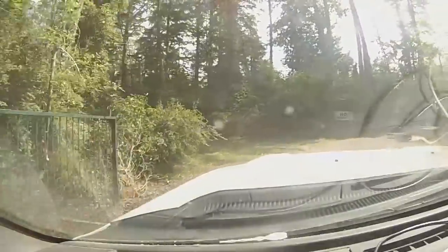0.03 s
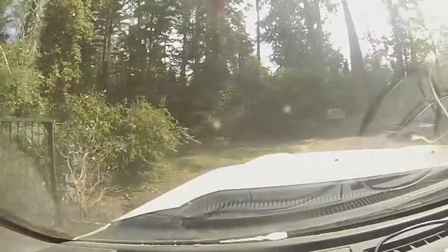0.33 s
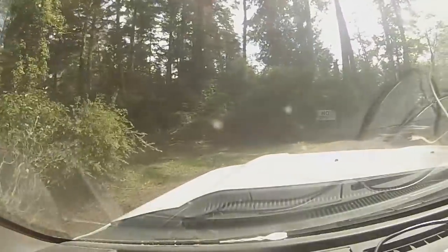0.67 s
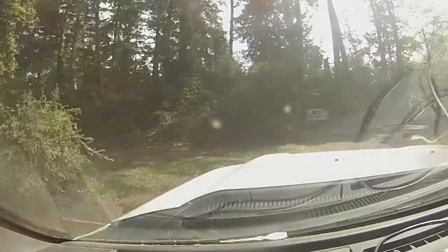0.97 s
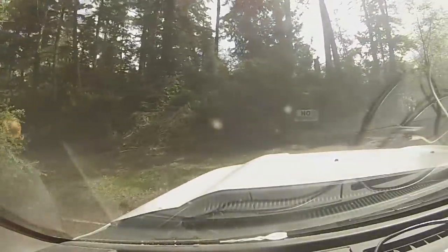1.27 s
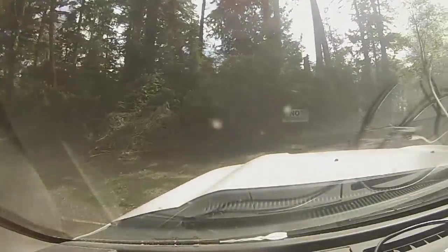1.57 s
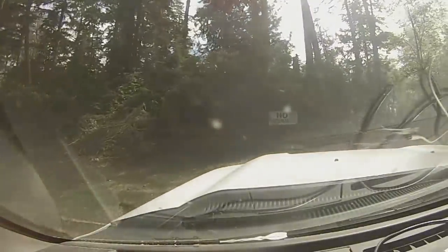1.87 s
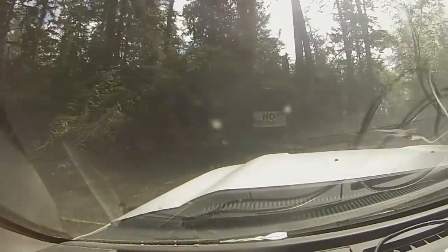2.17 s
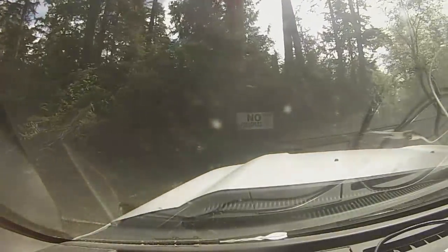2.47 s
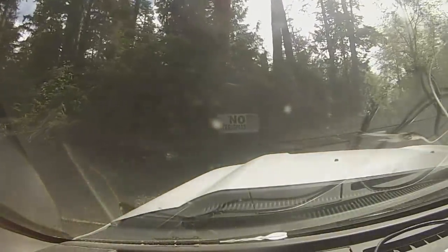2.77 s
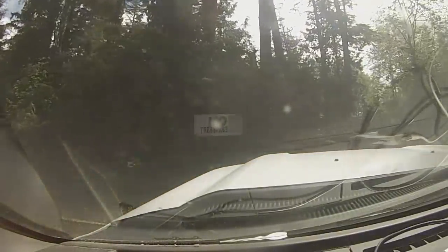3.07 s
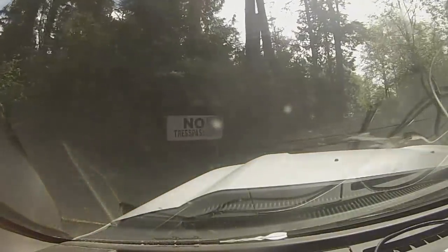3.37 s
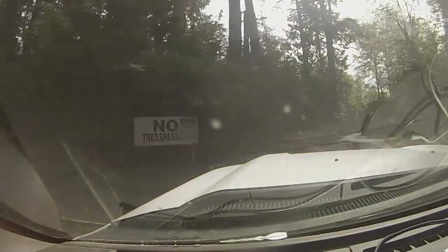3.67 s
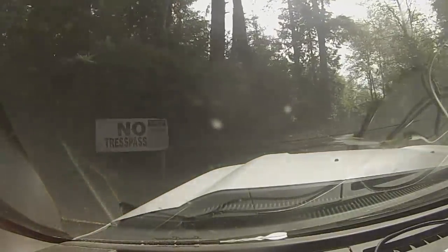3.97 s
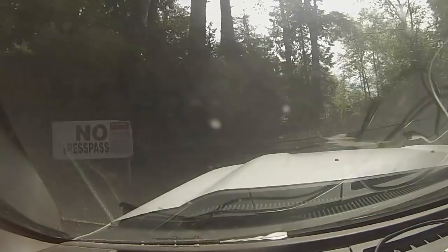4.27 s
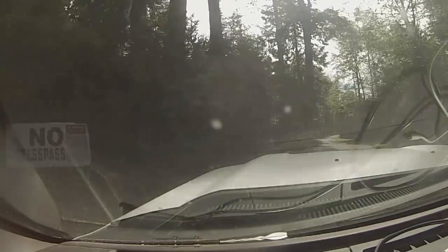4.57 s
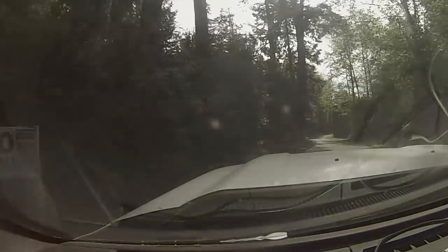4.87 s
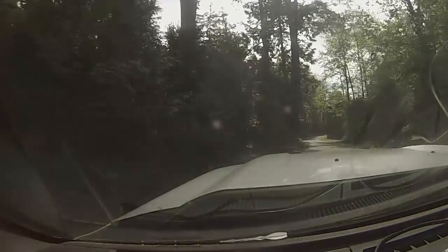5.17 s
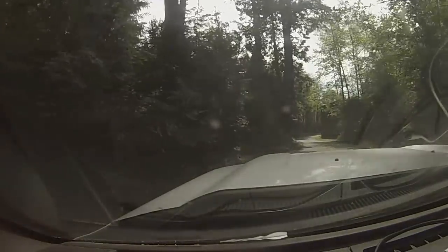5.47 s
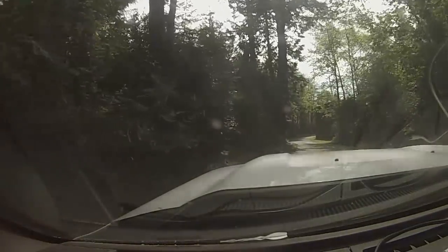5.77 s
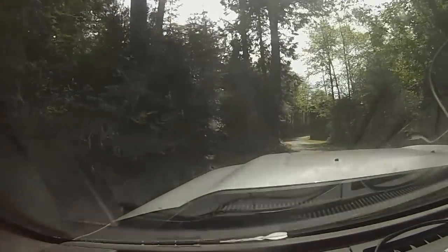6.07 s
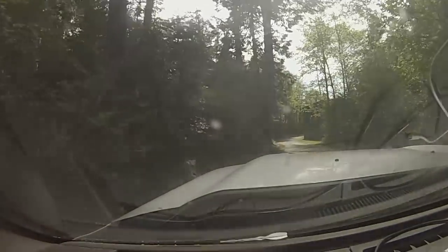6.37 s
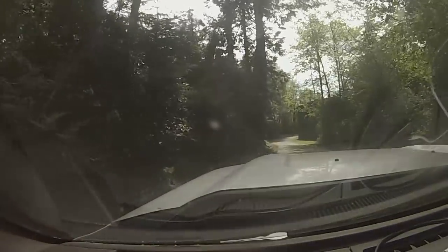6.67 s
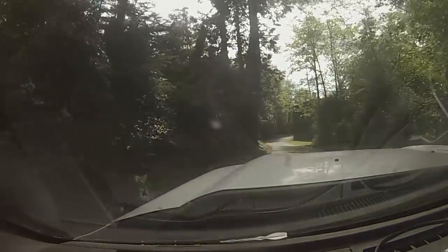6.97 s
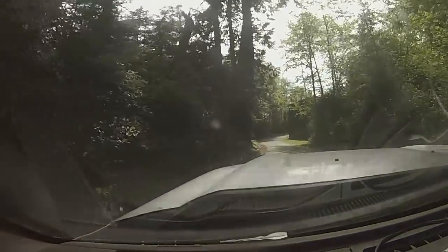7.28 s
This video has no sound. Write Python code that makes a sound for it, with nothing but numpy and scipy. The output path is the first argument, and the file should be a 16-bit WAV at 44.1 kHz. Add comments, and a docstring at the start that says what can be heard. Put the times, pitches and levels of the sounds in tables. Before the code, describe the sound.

Sharp, dry clicks and brief creaks come from a joint in a vehicle's flexing cab, heard close up from inside. They keep going unevenly over the deep rumble of the engine and tyres on rough ground. The engine slows and the ride goes quieter in the middle, then the revs rise toward the end, with low jolts and more frequent creaking.

```python
"""Inside the cab of a vehicle rolling slowly along a rough lane, heard from a camera's microphone.
The engine sags, then picks up behind the bulkhead, over body rumble, tyre noise and a hiss of air.
As the cab flexes, a joint close to the microphone sticks and slips, in single dry clicks and in runs
of about 30-50 a second. Every slip rings the same panel, the harder the brighter.
The camera's limiter ducks everything at the hard ones and recovers slowly."""
import sys
import numpy as np
from scipy import signal
from scipy.fft import rfft, irfft, next_fast_len
from scipy.io import wavfile
from scipy.ndimage import uniform_filter1d, minimum_filter1d

SR = 44100
rng = np.random.default_rng(int(sys.argv[2]) if len(sys.argv) > 2 else 0)


def inscribe(sig):
    """Save sig as 16-bit PCM at rate SR to the path in sys.argv[1].

    A 1-D sig is mono; a 2-D sig holds one channel per row.
    Samples are clipped to [-1, 1] before scaling.
    """
    pcm = np.round(np.clip(np.atleast_2d(sig).T, -1, 1) * 32767)
    wavfile.write(sys.argv[1], SR, pcm.astype(np.int16))


N = 323253


def undb(db):
    """Decibels to gain."""
    return 10 ** (np.asarray(db) / 20)


def unit(x):
    """Scale to rms 1."""
    return x / np.sqrt(np.mean(x ** 2))


def curves(table):
    """The columns of a (seconds, ..) table, one value a sample."""
    times, *columns = np.transpose(table)
    return [np.interp(np.arange(N) / SR, times, column) for column in columns]


def spectrum_db(points, hz):
    """Read (Hz, dB) points on a log-frequency axis."""
    point_hz, db = np.transpose(points)
    return np.interp(np.log(hz + 1), np.log(point_hz), db)


def noise(colour):
    """Noise of the given colour, rms 1."""
    size = next_fast_len(N, True)
    gain = undb(spectrum_db(colour, np.fft.rfftfreq(size, 1 / SR)))
    return unit(irfft(rfft(rng.standard_normal(size)) * gain, size)[:N])


def walk(rate):
    """Random levels held 1 / rate seconds and smoothed twice; spread near 1."""
    hold = int(SR / rate)
    steps = np.repeat(rng.standard_normal(N // hold + 1), hold)
    return 1.292 * uniform_filter1d(uniform_filter1d(steps, hold), hold)[:N]


def causal(db):
    """Frequency response with these gains that starts at once and then dies away."""
    cepstrum = irfft(np.log(undb(db)))
    half = len(cepstrum) // 2
    cepstrum[1:half] *= 2
    cepstrum[half + 1:] = 0
    return np.exp(rfft(cepstrum))


# The air in the cab. Each row: frequency in Hz, relative level in dB.
AIR_COLOUR = [(300, -1.5), (1500, 1.5), (3500, -1.5), (6000, -7.5), (9000, -12), (11000, -12.5),
              (13500, -14), (14800, -26.5), (16000, -42.5)]


def air(level_db=-64):
    """A steady hiss of air, far in the background."""
    return undb(level_db) * noise(AIR_COLOUR)


# The colour of the jingle. Each row: frequency in Hz, relative level in dB.
JINGLE_COLOUR = [(4000, -58.5), (7500, -24), (8800, -8), (9400, 5.5), (10100, -14.5), (11500, -19),
                 (13500, -13.5), (15500, -47)]


def jingle(level_db=-66, gap_s=.07, pip_s=.028, count=200):
    """A faint, thin jingle near 9 kHz: short pips of one size at uneven intervals."""
    gaps = gap_s * (0.37 + rng.gamma(2, .35, count))
    starts = (np.cumsum(gaps) * SR).astype(int)
    pips = np.bincount(starts[starts < N], minlength=N)
    envelope = signal.fftconvolve(pips, np.hanning(int(pip_s * SR)), "same")
    return undb(level_db) * envelope * noise(JINGLE_COLOUR)


# A faint whine in the cab. Each row: time in seconds, pitch in Hz, level in dB.
WHINE_TRACK = [(2.8, 411, -79), (3.15, 405, -54), (3.5, 387.5, -57), (4.05, 392.3, -56), (5.1, 374, -64),
               (5.4, 311, -64.5), (5.75, 294.4, -48.5), (6.15, 291.5, -55.5), (6.5, 330, -65),
               (7.3, 352.4, -52)]


def whine(wobble=.008, flutter_db=4.0):
    """A thin, wavering tone, perhaps from the transmission."""
    hz, db = curves(WHINE_TRACK)
    level = undb(db + flutter_db * walk(17))
    cycles = np.cumsum(hz * (1 + wobble * walk(18))) / SR
    return level * np.sin(2 * np.pi * cycles)


# The lane under the wheels. Each row: time in seconds, roughness in dB against average ground.
LANE_ROUGHNESS = [(0, -2.5), (.25, 3.5), (.85, 3), (1.2, 1), (2.5, 2), (3.1, -2.5), (4.2, -4.5),
                  (5.05, -4.5), (5.7, 1.5), (6.55, 2), (6.9, -3), (7.33, -1.5)]


def roughness_db():
    """The roughness of the passing ground, which drives grit, tyre noise and body rumble."""
    return curves(LANE_ROUGHNESS)[0]


def grit(level_db=-53.5, per_s=80, spread_db=5, band_hz=(580, 1200), t60=0.043, size=4096):
    """Small stones crunch under the tyres and reach the microphone muffled by the floor."""
    stones = (rng.random(N) < per_s / SR) * undb(spread_db * rng.standard_normal(N))
    decay = undb(-60 * np.arange(size) / SR / t60)
    power = signal.fftconvolve(stones ** 2, decay ** 2)[:N]
    crunch = rng.standard_normal(N) * np.sqrt(np.abs(power))
    floor = signal.butter(3, band_hz, "bandpass", fs=SR, output="sos")
    return undb(level_db + roughness_db()) * unit(signal.sosfilt(floor, crunch))


# The tyres, heard from inside. Each row: frequency in Hz, relative level in dB.
TYRE_COLOUR = [(30, -30), (75, 0), (115, 2), (170, -3), (280, -8.5), (450, -16.5), (700, -19), (1100, -37),
               (1700, -40), (3000, -47.5), (6000, -64), (12000, -100)]


def tyres(level_db=-39.5, flutter_db=1.6):
    """The tyres roll with a low, fluttering noise, louder on rough ground."""
    return undb(level_db + roughness_db() + flutter_db * walk(18)) * noise(TYRE_COLOUR)


# The body's rumble around the microphone. Each row: frequency in Hz, relative level in dB.
BODY_COLOUR = [(4, -29), (12, -12), (20, -2), (32, 9.5), (45, 6), (65, -5), (100, -9.5), (200, -53),
               (400, -110)]


def body_rumble(level_db=-34.5, spring_share=0.7, sway_db=0.8):
    """The swaying body rumbles with the share of the roughness that the springs pass on."""
    return undb(level_db + spring_share * roughness_db() + sway_db * walk(5)) * noise(BODY_COLOUR)


# Jolts from below. Each row: middle in seconds, pitch in Hz, peak level in dB, length in seconds.
GROUND_JOLTS = [(0.092, 53.9, -21, 0.047), (2.846, 47.2, -25, 0.16), (5.48, 49.93, -28, 0.21),
                (5.698, 31, -25.5, 0.19)]


def jolts():
    """Each jolt sets the cab booming, swelling and fading in a few slow cycles."""
    t = np.arange(N) / SR
    out = np.zeros(N)
    for middle, hz, db, length in GROUND_JOLTS:
        swell = np.exp(-(2.7 * (t - middle) / length) ** 2)
        out += undb(db) * swell * np.sin(2 * np.pi * (hz * t + rng.random()))
    return out


# The engine's speed. Each row: time in seconds, firing rate in Hz.
ENGINE_SPEED = [(0, 57), (.4, 57.1), (.7, 60.64), (1.1, 56), (1.5, 60.1), (2, 53.94), (2.4, 48.96),
                (2.9, 48.1), (3.4, 46), (4, 41.9), (5.1, 42), (5.5, 50), (5.8, 59), (6.3, 70.3),
                (6.7, 75.5), (7, 76.74), (7.33, 76.7)]
# Its orders, heard in the cab. Each row: multiple of the firing rate, relative level in dB.
ENGINE_ORDERS = [(.5, -20.5), (1, 1), (1.5, -14.5), (2, -20.5), (3, -24), (4, -24.5)]
# Its load. Each row: time in seconds, level of the boom in dB before the bulkhead.
ENGINE_LOAD = [(0, -22), (.5, -29), (.7, -23), (1.2, -31), (1.5, -25), (2.1, -31), (4, -32.5), (4.4, -28.5),
               (4.8, -35), (5.5, -30), (6.1, -39), (6.6, -32.5), (7.33, -34)]


def engine(bulkhead_db=-3.5, sway_db=1.4, rough_db=2.5, wobble=.04, smooth_hz=68):
    """Firing orders boom through the bulkhead: lumpy at low speed, more even once the engine pulls."""
    firing_hz, = curves(ENGINE_SPEED)
    load_db, = curves(ENGINE_LOAD)
    level = undb(bulkhead_db + load_db + sway_db * walk(6))
    lumpy = 0.26 + 1 / (1 + (firing_hz / smooth_hz) ** 20)
    firings = np.cumsum(firing_hz * (1 + wobble * lumpy * walk(20))) / SR
    boom = np.zeros(N)
    for order, db in ENGINE_ORDERS:
        strength = undb(db + rough_db * lumpy * walk(30))
        boom += strength * np.sin(2 * np.pi * (order * firings + rng.random()))
    return level * unit(boom)


def cab_echoes(x, size=8192):
    """Glass and dashboard scatter the treble at once; the upholstered cab adds a short, dull tail."""
    t = np.arange(size) / SR

    def echoes(db, t60, hz, kind):
        """Dense reflections that die away."""
        tail = rng.standard_normal(size) * undb(-60 * t / t60) * (t > .0012)
        tone = signal.butter(2, hz, kind, fs=SR, output="sos")
        return undb(db) * signal.sosfilt(tone, tail / np.sqrt(np.sum(tail ** 2)))

    glass = echoes(db=-9.5, t60=0.012, hz=2200, kind="highpass")
    upholstery = echoes(db=-33, t60=0.073, hz=1200, kind="lowpass")
    return x + signal.fftconvolve(x, glass + upholstery)[:N]


# The broad colour of the panel, close up. Each row: frequency in Hz, relative level in dB.
PANEL_COLOUR = [(300, -18), (500, -12.5), (700, -11.5), (1100, 0.0), (1450, -10), (2400, -5.5), (3700, -11),
                (4300, -21.5), (5200, -35), (6200, -43.5), (9500, -48.5), (11000, -61), (15000, -65)]
# Its resonances (+) and antiresonances (-). Each row: centre in Hz, width in Hz, gain in dB.
PANEL_RESONANCES = [(652.6, 43.6, 12.5), (738, 32, 5.5), (974, 212, 8), (1790, 450, 1), (2206, 39, -20),
                    (2365, 710, -7), (2644, 28, 4), (3058, 413, -29.5), (3080, 11, 2.5), (3196, 87, 4.5),
                    (4105, 370, -14.5), (4830, 75, -11), (4950, 140, 5.5), (5270, 66, -12)]


def panel(hz, low_hz=340, high_hz=15000):
    """Ring of a slip, of unit energy, with bass and top treble filtered off."""
    colour_db = spectrum_db(PANEL_COLOUR, hz) - 10 * np.log10(1 + (hz / high_hz) ** 20)
    bass_cut = (1j * hz / (1j * hz + low_hz)) ** 2
    response = causal(colour_db) * bass_cut
    for centre, width, db in PANEL_RESONANCES:
        band = 1j * hz * width / (centre ** 2 - hz ** 2 + 1j * hz * width)
        response *= 1 + (undb(db) - 1) * band
    return response / np.sqrt(np.sum(irfft(response) ** 2))


# Single clicks beside the microphone. Each row: start in seconds, force in dB, extra treble in dB.
SINGLE_SLIPS = [(.0167, -3.5, 1), (.4551, -2.5, -10.5), (.4979, 0.5, 1), (.5758, -3.5, -8), (.7134, -4, -8),
                (0.8562, -4, -5.5), (0.9123, -2, -6), (1.0428, -4.5, -4), (1.1126, 4.5, 0),
                (1.2057, -0.5, 0.5), (1.5213, 4, 0), (1.6371, -8.5, -9), (1.8077, 4, -0.5),
                (2.0666, -5.5, 0.5), (2.2296, -17, -5), (2.5007, -13.5, -7), (2.5646, -8, 0),
                (2.7959, -7.5, -4), (2.8176, -18.5, -8), (2.8502, -20.5, -4), (2.8707, -2, 2.5),
                (2.9164, -4, 0.5), (3.0677, -12, -5), (3.1649, -12.5, -14), (3.6902, -9.5, -7.5),
                (3.7705, -1, 1), (3.8673, -5, 4.5), (4.413, -12, -9), (4.8662, -8.5, 1),
                (5.1508, -12.5, -4.5), (5.2586, -17, -15), (5.3455, -6, -3), (5.3896, -4.5, -0.5),
                (5.4727, 1.5, -2.5), (5.743, -9.5, -3), (6.1116, -15.5, -11), (6.213, -2, -1),
                (6.347, 1, 0), (6.597, 2, 4), (6.6539, 0, 3.5), (6.75, 4, 2.5), (6.9143, -28.5, 42),
                (6.9569, -3, 0.5), (7.008, -5.5, 9)]
# Creaks of the same joint, runs of almost evenly spaced slips. Each row: start and end in seconds,
# number of slips, first and last force in dB, extra treble in dB.
SLIP_RUNS = [(.135, 0.1552, 2, 14.5, 11.5, -7), (.212, .2365, 2, -5, -4.5, -8),
             (.313, 0.337, 2, 1, -8, -4.5), (.5938, .6136, 2, 1, -2, -2), (.9874, 1.0066, 2, 7, 3.5, -2.5),
             (1.3367, 1.354, 2, 4.5, -9.5, -4.5), (1.4265, 1.4695, 3, -0.5, 0.5, -1),
             (1.541, 1.5683, 2, -1, 1.5, -1), (1.6796, 1.7054, 2, 1, -1.5, 1.5),
             (1.9012, 1.9263, 2, -4, -0.5, 1), (1.967, 1.9858, 2, 5.5, 3.5, 1),
             (2.0017, 2.02, 2, -13, -5, -1), (2.1667, 2.2126, 3, -1, -4, 0),
             (2.2497, 2.2696, 2, -5, -11, -1.5), (2.3007, 2.3233, 2, 4, -5, -3.5),
             (2.4, 2.4421, 3, 1.5, -2, 1.5), (2.4627, 2.483, 2, 5, 1.5, -2.5),
             (2.6974, 2.7324, 2, -2, -11, 2.5), (3.3038, 3.3221, 2, -4.5, -12, 2),
             (3.4057, 3.457, 3, 1.5, -3, -0.5), (4.1003, 4.1239, 2, -6, -6.5, 1),
             (4.443, 4.5459, 5, 2, -5.5, 2), (4.679, 4.7013, 2, -12, -7, 1.5),
             (4.7344, 4.7587, 2, -5, -3, 4.5), (4.7932, 4.8385, 3, 3, -3.5, 3),
             (5.2925, 5.3149, 2, 4, 0.5, 1), (5.5507, 5.5764, 2, 5, 1, -3.5),
             (5.6434, 5.6655, 2, -2, 2, -2.5), (5.8176, 5.852, 2, 1.5, -2.5, 0),
             (5.8834, 5.9186, 2, 5, 5, 0), (5.9434, 5.973, 2, 1, -12, 2), (6.1447, 6.1726, 2, 4, -1.5, -1),
             (6.2782, 6.2967, 2, -7, -15.5, -4.5), (6.3767, 6.4368, 3, 7.5, 8.5, -0.5),
             (6.4663, 6.4968, 2, 4, 5.5, 1), (6.53, 6.566, 2, -4, -10, 2), (6.6971, 6.722, 2, 2.5, -2, 0.5),
             (6.7817, 6.824, 3, -0.5, -12.5, 0.5), (7.058, 7.1027, 3, -5, -15, 5.5),
             (7.214, 7.3193, 5, -9.5, -5, 4.5)]


def slips(swell_db=1.36, uneven_db=1.44, uneven_s=.0008, settle_share=.25, settle_s=.023,
          settle_db=-27, settle_spread_db=5.5, creep_count=12, creep_db=-33.5, creep_spread_db=3.5):
    """The joint sticks and slips as the cab flexes: every slip as (seconds, force dB, extra treble dB)."""
    rows = list(SINGLE_SLIPS)
    for start, end, number, first_db, last_db, extra_db in SLIP_RUNS:
        for progress in np.linspace(0, 1, round(number)):
            # mid-creak the load swells, and slips come a little early or late, weak or strong
            middle = np.sin(np.pi * progress)
            late, strength = rng.uniform(-1, 1, 2)
            time = start + progress * (end - start) + middle * uneven_s * late
            ramp_db = first_db + progress * (last_db - first_db)
            rows.append((time, ramp_db + middle * (swell_db + uneven_db * strength), extra_db))
    # after a click or creak the joint may settle with one weak slip
    ends = [row[0] for row in SINGLE_SLIPS] + [row[1] for row in SLIP_RUNS]
    for end, (chance, late, strength) in zip(ends, rng.random((len(ends), 3))):
        if chance < settle_share:
            time = end + settle_s * (.75 + late / 2)
            rows.append((time, settle_db + settle_spread_db * (2 * strength - 1), 0))
    # at random moments it creeps in faint ticks
    for moment, strength in rng.random((creep_count, 2)):
        rows.append((moment * N / SR, creep_db + creep_spread_db * (2 * strength - 1), 0))
    return [row for row in rows if row[0] < N / SR]


def creaking_joint(gain_db=12, treble_db=-2.5, treble_per_force=1.29, dullest_db=-25.5, edge_hz=2600,
                   crack_hz=6000, scatter_db=1.91, catch_db=-22.0, catch_s=0.0047, size=8192):
    """Each slip kicks the panel: a hard one reaches its upper modes, a soft one only knocks near 1 kHz."""
    hz = np.fft.rfftfreq(size, 1 / SR)
    ring = panel(hz)
    shelves = sum(1 - 1 / (1 + (hz / corner) ** 6) for corner in (edge_hz, crack_hz))
    scatter_hz = np.geomspace(400, 16000, 12)
    events = slips()
    shifts = rng.standard_normal((len(events), len(scatter_hz)))
    catches = rng.random((len(events), 2))
    out = np.zeros(N + size)
    for (time, force_db, extra_db), shift, (late, grip) in zip(events, shifts, catches):
        sharp_db = max(treble_db + treble_per_force * force_db, dullest_db) + extra_db
        # the point of contact wanders, so no two slips have quite the same colour
        wander_db = scatter_db * np.interp(hz, scatter_hz, shift) * np.minimum(2 * hz / edge_hz, 1)
        kick = causal(sharp_db * shelves + wander_db)
        # the joint catches again a few milliseconds later, softer and duller
        delay = np.exp(-2j * np.pi * hz * catch_s * (0.293 + late))
        catch = undb(catch_db + 20 * (grip - .5)) * delay / (1 + 1j * hz / edge_hz)
        start = max(int(time * SR), 0)
        out[start:start + size] -= undb(force_db + gain_db) * irfft(ring * kick * (1 + catch))
    return out[:N]


def scene():
    """One microphone in the cab: the creaking joint close by, over engine, lane and air."""
    background = engine() + body_rumble() + tyres() + grit() + air() + jingle()
    joint = cab_echoes(creaking_joint())
    return (background + jolts() + whine() + joint)[None]


def limiter(x, ceiling_db=-9.5, release_db_per_s=14.5, ahead_s=0.018):
    """Looks ahead, ducks at once to hold the 2 ms level at the ceiling, and recovers at a steady rate."""
    power = uniform_filter1d(x ** 2, size=88)
    over_db = np.maximum(10 * np.log10(np.maximum(power, 1e-12)) - ceiling_db, 0)
    recovery = release_db_per_s * np.arange(N) / SR
    duck_db = np.maximum.accumulate(over_db + recovery) - recovery
    ahead = int(ahead_s * SR)
    gain_db = minimum_filter1d(-duck_db, ahead, origin=-(ahead // 2) + 1)
    return x * undb(uniform_filter1d(gain_db, size=256))


def record(dry, hiss_db=-78.5, top_hz=16500):
    """The camera limits the level, adds a faint hiss of its own, clips at full scale and cuts the top."""
    own_hiss = undb(hiss_db) * noise([(1000, -1), (9000, -2.5), (12500, -8.5), (15000, -30)])
    clipped = np.clip(limiter(dry[0]) + own_hiss, -1, 1)
    top_cut = signal.ellip(8, .2, 70, top_hz, fs=SR, output="sos")
    return signal.sosfilt(top_cut, clipped)[None]


dry = scene()
out = record(dry)
inscribe(out)
```